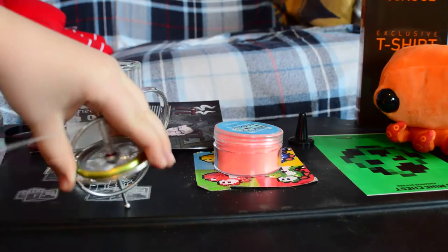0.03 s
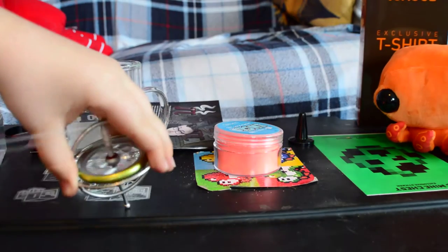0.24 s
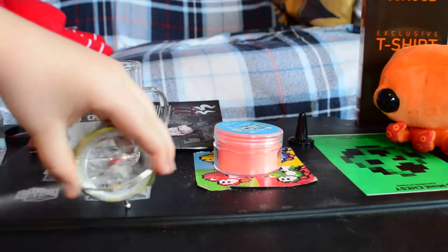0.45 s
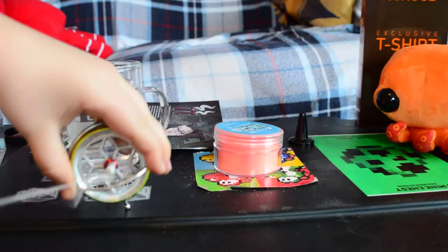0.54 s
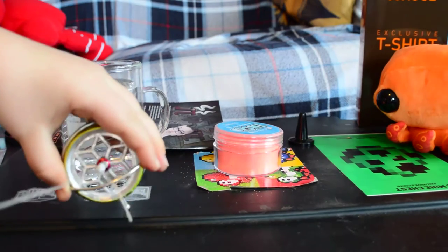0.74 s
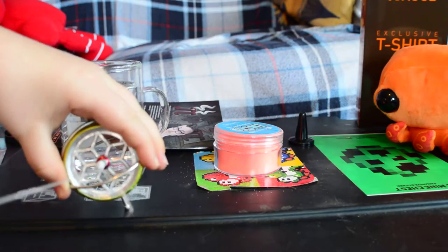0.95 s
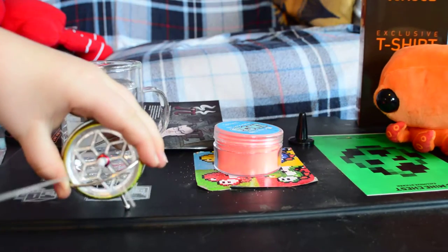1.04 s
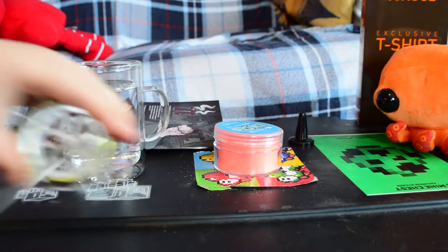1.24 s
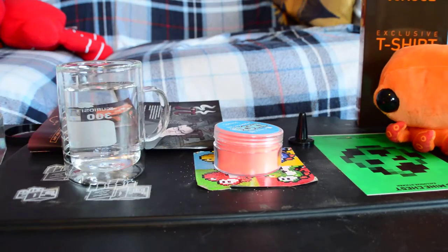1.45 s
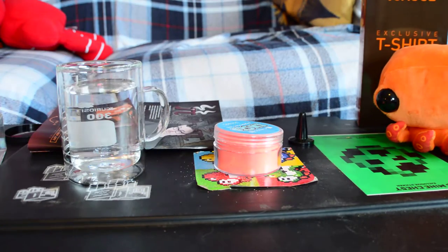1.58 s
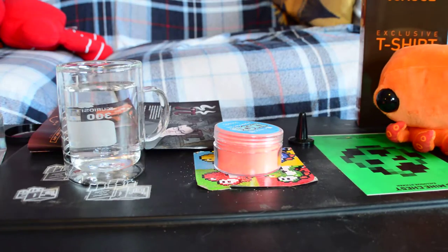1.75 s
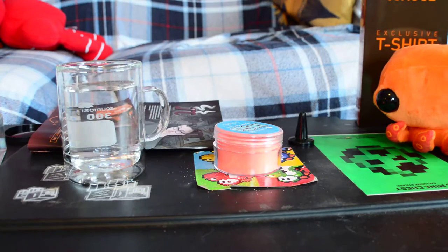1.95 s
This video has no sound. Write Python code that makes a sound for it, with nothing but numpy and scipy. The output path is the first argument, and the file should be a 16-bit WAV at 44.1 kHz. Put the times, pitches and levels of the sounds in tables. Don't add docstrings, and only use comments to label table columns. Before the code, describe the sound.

Metal toy clatters sharply on a table, pauses, then is struck with bright, shimmering high rings.

```python
import sys
import numpy as np
from scipy import signal
from scipy.fft import rfft, irfft, next_fast_len
from scipy.io import wavfile
from scipy.ndimage import uniform_filter1d

SR = 44100
rng = np.random.default_rng(int(sys.argv[2]) if len(sys.argv) > 2 else 0)


def boost_factor(decibels):
    exponent = np.asarray(decibels, float) / 20
    return 10 ** exponent


def transcribe(u):
    v = np.clip(np.atleast_2d(u).T, -1, 1)
    q = np.round(v * 32767).astype(np.int16)
    wavfile.write(sys.argv[1], SR, q)


N = 88640

# time in seconds, grit level in dB, rumble level in dB.
DRAG_PATH = [(0, -55.5, -48.5), (0.036, -51, -47.5), (0.046, -42, -33), (0.073, -41.5, -42.5),
             (.12, -48.5, -48), (0.166, -45.5, -43.5), (.19, -48.5, -39), (0.239, -51, -35.5),
             (0.256, -29.5, -31), (0.276, -27.5, -27.5), (.3, -49, -30), (.345, -66, -46.5),
             (0.368, -25.5, -26), (0.422, -32.5, -28.5), (0.469, -55.5, -52), (.57, -62.5, -58),
             (.62, -73, -55.5)]
# frequency in Hz, density in dB per Hz.
GRIT_SPECTRUM = [(150, -62), (400, -6), (1100, -15.5), (2000, -8), (2450, -8), (3000, -16), (9400, -15.5),
                 (16000, -25)]
# frequency in Hz, width in Hz, level in dB.
SQUEAL_MODES = [(2500, 130, -3.5), (9100, 500, 2)]
# frequency in Hz, density in dB per Hz.
RUMBLE_SPECTRUM = [(40, -16), (110, -5), (240, 1.5), (480, -7), (900, -10.5), (2000, -34)]
# time in seconds, level in dB.
BUZZ_PATH = [(.2, -64.5), (.245, -57.5), (.252, -30), (.29, -46), (.345, -53.5), (.356, -44), (.363, -5),
             (.367, -5.5), (.376, -14), (.38, -10), (.387, -24.5), (.398, -16.5), (.403, -9), (.41, -32.5),
             (.46, -46), (.51, -63), (.56, -62), (.62, -72)]
# frequency in Hz, width in Hz, level in dB.
HELD_ROTOR_MODES = [(9260, 70, 0), (9375, 60, 0), (9510, 80, -2), (9960, 600, -11)]
SQUEAL_END_S, RUMBLE_DB = .19, -3
GRAINS_PER_S, GRAIN_SPREAD_DB = 14000, 2

# start in seconds, crack in dB, crack t60 in seconds, table push in dB.
KNOCK_EVENTS = [(0.0435, -36, .02, -22), (0.1982, -24.5, 0.016, -27.5), (0.2474, -14, 0.012, -30.5),
                (.249, -5, 0.011, -18), (0.2518, -13, 0.0091, -34.5), (.2582, -17, 0.0069, -29.5),
                (.2635, -18, .02, -21.5), (0.269, -25, 0.0072, -29), (0.272, -18.5, 0.0087, -25),
                (0.2876, -8.5, 0.0069, -35.5), (0.291, -26, 0.0074, -17), (.3558, -41.5, .01, -17.5),
                (0.3571, 4.5, 0.015, -8), (0.3622, -7.5, 0.016, -24.5), (0.38, -12, .012, -21),
                (0.387, -25, .01, -30), (0.3994, -6, 0.0096, -20.5), (0.4023, -2, .012, -13),
                (.55, -46.5, .05, -55), (.409, -26.5, .01, -29.5), (0.611, -65, .01, -48)]
# frequency in Hz, density in dB per Hz.
CRACK_SPECTRUM = [(240, -36.5), (400, -8), (1250, -7), (2050, -17), (3020, -18), (4000, -8), (5700, -16.5),
                  (9180, -3.5), (16000, -28.5)]
# frequency in Hz, width in Hz, level in dB.
TABLE_MODES = [(250, 32, -9), (508.3, 90, 5.5), (714, 90, -12.5), (990, 360, -11.5), (1303, 89, -1.5),
               (2200, 400, -10.5), (3900, 170, -9.5)]
# frequency in Hz, level in dB, t60 in seconds.
HUM_MODES = [
    (207, -49, 1.3),
    (933, -62, 3.5),
]
CRACK_MAX_S, HUM_S = .014, .47

# start in seconds, level in dB, frequency in Hz, t60 in seconds.
TICK_EVENTS = [(1.1875, -41, 1400, .014), (1.188, -54, 3600, .012), (1.082, -52, 4000, .015),
               (1.086, -52, 3400, .015), (1.027, -50, 1500, .015), (1.264, -42, 350, .02),
               (1.389, -44, 10000, .05), (1.741, -47, 1700, .015), (1.746, -50, 2200, .02),
               (1.203, -58, 9330, .1), (1.204, -58, 10800, .01), (1.229, -54, 10000, .03),
               (1.088, -54, 9000, .01), (1.088, -58, 12000, .008), (1.2643, -6, 10200, .008),
               (1.3066, -22, 13100, .012), (1.309, -24, 12070, .018), (1.2565, -22, 8145, .02),
               (.3812, -18, 3900, .015), (.3812, -16, 7300, .012), (.3625, -16, 3700, .012),
               (.62, -52, 335, .2), (1.1, -46, 330, .07), (1.126, -53, 560, .06), (.265, -34, 120, .12),
               (.415, -30, 125, .12), (.62, -50, 130, .15), (.3565, -4, 515, .035), (.4025, -10, 1250, .03),
               (.358, -15, 1280, .03)]

# start in seconds, level in dB, brightness in dB.
TAP_EVENTS = [
    (1.0274, -45.5, 19),
    (1.071, -37, 9.5),
    (1.078, -35, 24),
    (1.083, -28.5, 16),
    (1.089, -38.5, -34.5),
    (1.134, -52, -18.5),
]
# frequency in Hz, width in Hz, level in dB.
PAD_MODES = [(240, 41, 2), (327.3, 92, -4), (542, 78, -1), (850, 82, -8.5), (1280, 111, -0.5),
             (3700, 600, -22.5)]

# start in seconds, crack level in dB.
STRIKE_EVENTS = [(1.2548, -5), (1.2644, -11.5), (1.3065, -12), (1.351, -34.5), (1.407, -15.5),
                 (1.474, -17.5), (1.481, -30), (1.487, -23.5), (1.741, -50), (1.752, -61), (1.775, -57),
                 (1.964, -47), (1.973, -58), (1.996, -57)]
# frequency in Hz, density in dB per Hz.
CLINK_SPECTRUM = [(410, -79), (700, -42), (2130, -25), (4990, -26.5), (6830, -22), (9230, -4.5),
                  (10800, -20), (13300, -15.5), (16000, -23.5)]
# frequency in Hz, level in dB, t60 in seconds.
CAGE_MODES = [(2080, -35, 0.034), (2745, -34, 0.025), (3720, -22, 0.023), (4927, -34, 0.0281),
              (5850, -29.5, 0.056), (8020, -13.5, 0.034), (9430, -4, 0.028), (10000, -4.5, 0.02),
              (10820, -16, 0.019), (11766, -11.5, 0.028), (12980, -29, 0.025)]
# start in seconds, level in dB, delay to the first beat null in
# seconds, null to null in seconds, t60 in seconds.
RING_EVENTS = [
    (1.2545, -5, .05, .072, .3),
    (1.2642, -6, .014, .032, .7),
    (1.3065, 1.5, .0045, .04, .075),
    (1.357, -38, .03, .072, .5),
    (1.4075, -13, .068, .072, .17),
    (1.474, -20, .018, .072, .12),
    (1.493, -27, .056, .072, .43),
    (1.55, -27, 0, .068, .26),
    (1.618, -47, 0, .075, .55),
    (1.962, -58, .05, .072, .3),
]
# time in seconds, frequency in Hz.
RING_PITCH = [(1.25, 9345), (1.29, 9338), (1.35, 9335), (1.415, 9317), (1.56, 9312), (1.68, 9292),
              (1.8, 9308), (1.95, 9400)]
# start in seconds, frequency in Hz, level in dB, delay to the first beat null in
# seconds, t60 in seconds.
SIDE_RINGS = [(1.2642, 3430, -39, .06, .15), (1.3065, 3430, -55, .05, .5), (1.4075, 3450, -57, .05, .4),
              (1.484, 3443, -46, .055, .9), (1.2642, 8245, -33, .06, .12), (1.3065, 8258, -44, .065, .3),
              (1.4075, 8242, -31, .06, .13), (1.476, 8180, -37, .068, .33), (1.2545, 9470, -4, .05, .035),
              (1.3065, 9440, -15, .06, .05), (1.4075, 9469, -29, .06, .19), (1.49, 9426, -36, .06, .2),
              (1.2642, 2750, -33, .05, .04), (1.455, 2740, -47, .05, .15), (1.474, 2740, -50, .06, .12),
              (1.2545, 15380, -19, .036, .2), (1.474, 15340, -46, .05, .2), (1.2642, 14360, -35, .06, .08),
              (1.3065, 14480, -35, .06, .1), (1.4075, 14180, -38, .05, .08), (1.474, 14100, -36, .06, .1),
              (1.2545, 11660, -30, .06, .15), (1.318, 11640, -46, .06, .12), (1.4075, 11660, -38, .06, .12),
              (1.474, 11640, -44, .06, .17), (1.2642, 9900, -24, .05, .06), (1.4075, 10230, -36, .06, .06),
              (1.474, 9920, -38, .06, .11), (1.2545, 13000, -32, .06, .07)]
DAMP_TIMES = [
    1.3065,
    1.4075,
    1.474,
    3,
]
CLINK_S, WASH_S, WASH_DB = .011, .09, -26
BEAT_S, BEAT_DEPTH = .072, .97

# frequency in Hz, t60 in seconds.
ROOM_T60 = [(100, 0.31), (500, 0.31), (3000, .22), (12000, 0.099)]
# frequency in Hz, density in dB per Hz.
FLOOR_SPECTRUM = [(15, -38), (25, -7.5), (70, 1), (427, -14.5), (863, -13.5), (936, -13.5), (1190, -15.5),
                  (1480, -15.5), (16000, -26)]
TABLE_ROOM_DB, PAD_ROOM_DB, CLINK_ROOM_DB = -16.5, -16.5, -22
FLOOR_DB, BASS_HZ = -60.5, 71

# start in seconds, end in seconds.
TREBLE_DIPS = [
    (.232, .243),
    (.338, .351),
    (1.235, 1.249),
]
DIP_HZ, SPARED_HZ, EDGE_HZ = 4000, 9400, 500
CLIP_TOP, CLIP_HARD = 1, 8
TOP_HZ, TOP_WIDTH_HZ, TOP_DB = 15600, 900, -22


def unit(x):
    return x / np.sqrt(np.mean(x ** 2) + 1e-20)


def along(points, hz):
    f, v = np.transpose(points)
    return np.interp(np.log(hz + 1), np.log(f + 1), v)


def curve(rows):
    return np.interp(np.arange(N) / SR, *np.transpose(rows))


def filtered(x, response):
    m = next_fast_len(N + SR // 2)
    return irfft(rfft(x, m) * response(np.fft.rfftfreq(m, 1 / SR)), m)[:N]


def shaped(x, spectrum):
    return unit(filtered(x, lambda hz: boost_factor(along(spectrum, hz))))


def coloured(spectrum):
    return shaped(rng.standard_normal(N), spectrum)


def body(x, modes):
    def response(f):
        total = 0
        for k, (centre_hz, width_hz, db) in enumerate(modes):
            loss = 1j * f * width_hz
            total = total + (-1) ** k * boost_factor(db) * loss / (centre_hz ** 2 - f * f + loss + 1e-9)
        return total

    blow = irfft(response(np.fft.rfftfreq(SR, 1 / SR)))
    return filtered(x, response) / np.abs(blow).max()


def dying(s, db, t60, attack_s=0.00051):
    t = np.maximum(np.arange(N) / SR - s, 0)
    return boost_factor(db - 60 * t / t60) * (1 - np.exp(-t / attack_s))


def drag():
    t = np.arange(N) / SR
    s, grit_db, rumble_db = np.transpose(DRAG_PATH)
    fade = np.clip((s[-1] + 0.091 - t) / 0.08, 0, 1)
    hits = rng.random(N) < GRAINS_PER_S / SR
    grains = hits * boost_factor(GRAIN_SPREAD_DB * rng.standard_normal(N)) * rng.standard_normal(N)
    squeal = (t < SQUEAL_END_S) * unit(body(grains, SQUEAL_MODES))
    grit = boost_factor(np.interp(t, s, grit_db)) * (shaped(grains, GRIT_SPECTRUM) + squeal)
    rumble = boost_factor(RUMBLE_DB + np.interp(t, s, rumble_db)) * coloured(RUMBLE_SPECTRUM)
    buzzing = (t > BUZZ_PATH[0][0]) * (t < BUZZ_PATH[-1][0])
    buzz = buzzing * boost_factor(curve(BUZZ_PATH)) * unit(body(rng.standard_normal(N), HELD_ROTOR_MODES))
    return fade * (grit + rumble) + buzz


def knocks():
    t = np.arange(N) / SR
    crack, push, hum = np.zeros(N), np.zeros(N), np.zeros(N)
    for s, crack_db, t60, table_db in KNOCK_EVENTS:
        crack += dying(s, crack_db, min(t60, CRACK_MAX_S), attack_s=0.00013)
        push += dying(s, table_db - 12, 0.0027, attack_s=0.00027)
    for hz, db, t60 in HUM_MODES:
        hum += dying(HUM_S, db, t60, attack_s=0.023) * np.sin(2 * np.pi * hz * t)
    return crack * coloured(CRACK_SPECTRUM) + body(push, TABLE_MODES) + hum


def ticks():
    t, out = np.arange(N) / SR, np.zeros(N)
    for s, db, hz, t60 in TICK_EVENTS:
        out += dying(s, db, t60, attack_s=0.22 / hz) * np.sin(2 * np.pi * hz * (t - s))
    return out


def taps():
    push = np.zeros(N)
    for s, db, bright_db in TAP_EVENTS:
        push += dying(s, db - 18 + bright_db, 0.012 / boost_factor(bright_db), attack_s=0.0006)
    return body(push, PAD_MODES)


def beating(s, null_s, beat_s):
    t = np.arange(N) / SR - s - null_s
    return np.sqrt(1 - BEAT_DEPTH * np.cos(np.pi * t / beat_s) ** 2)


def clinks():
    t, out = np.arange(N) / SR, np.zeros(N)
    clink = coloured(CLINK_SPECTRUM)
    for s, db in STRIKE_EVENTS:
        out += (dying(s, db, CLINK_S) + dying(s, db + WASH_DB, WASH_S)) * clink
        for hz, mode_db, t60 in CAGE_MODES:
            level_db = db + mode_db + 4.1 * rng.normal()
            mode_hz = hz * (1 + .004 * rng.normal())
            out += dying(s, level_db, t60) * np.sin(2 * np.pi * mode_hz * t)
    return out


def rotor_ring():
    t, swell = np.arange(N) / SR, np.zeros(N)
    for s, db, null_s, beat_s, t60 in RING_EVENTS:
        swell = np.where(t > s, beating(s, null_s, beat_s) * dying(s, db, t60), swell)
    phase = 2 * np.pi * np.cumsum(curve(RING_PITCH)) / SR
    return uniform_filter1d(swell, size=21) * np.sin(phase)


def side_rings():
    t, out = np.arange(N) / SR, np.zeros(N)
    for s, hz, db, null_s, t60 in SIDE_RINGS:
        stop_s = min(d for d in DAMP_TIMES if d > s)
        free = np.clip((stop_s - t) / .003 + 1, 0, 1)
        level = free * beating(s, null_s, BEAT_S) * dying(s, db, t60, attack_s=.001)
        out += level * np.sin(2 * np.pi * hz * (t - s))
    return out


def room(x, wet_db):
    hz, t, z = signal.stft(rng.standard_normal(SR // 2), SR, nperseg=256)
    decay = boost_factor(-60 * t / along(ROOM_T60, hz)[:, None])
    tail = signal.istft(z * decay, SR, nperseg=256)[1]
    delayed = np.pad(x, (200, 0))
    return x + boost_factor(wet_db) * signal.fftconvolve(delayed, tail / np.linalg.norm(tail))[:N]


def scene():
    table = room(drag() + knocks(), TABLE_ROOM_DB)
    soft = room(taps(), PAD_ROOM_DB)
    metal = room(ticks() + clinks() + rotor_ring() + side_rings(), CLINK_ROOM_DB)
    near = filtered(table + soft + metal, lambda hz: (1j * hz / (BASS_HZ + 1j * hz)) ** 2)
    return (near + boost_factor(FLOOR_DB) * coloured(FLOOR_SPECTRUM))[None]


def dip_treble(x):
    def treble_gain(hz):
        high = (1 + np.tanh((hz - DIP_HZ) / EDGE_HZ)) / 2
        return high * (1 - np.exp(-((hz - SPARED_HZ) / EDGE_HZ) ** 2))

    t = np.arange(N) / SR
    lost = sum((t > a) * (t < b) for a, b in TREBLE_DIPS) * 1.
    return x - filtered(x, treble_gain) * uniform_filter1d(lost, size=89)


def band_limit(x):
    return signal.sosfilt(signal.butter(12, 16290, fs=SR, output="sos"), x)


def record(dry):
    clipped = dry[0] / (1 + np.abs(dry[0] / CLIP_TOP) ** CLIP_HARD) ** (1 / CLIP_HARD)
    mix = filtered(dip_treble(clipped), lambda hz: boost_factor(TOP_DB * np.clip((hz - TOP_HZ) / TOP_WIDTH_HZ, 0, 1)))
    return band_limit(mix[None])


dry = scene()
out = record(dry)
transcribe(out)
```